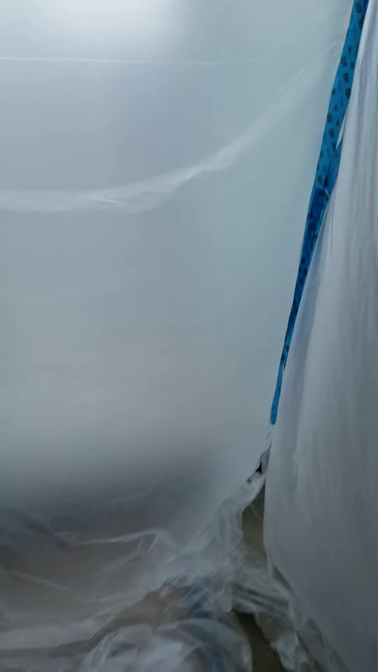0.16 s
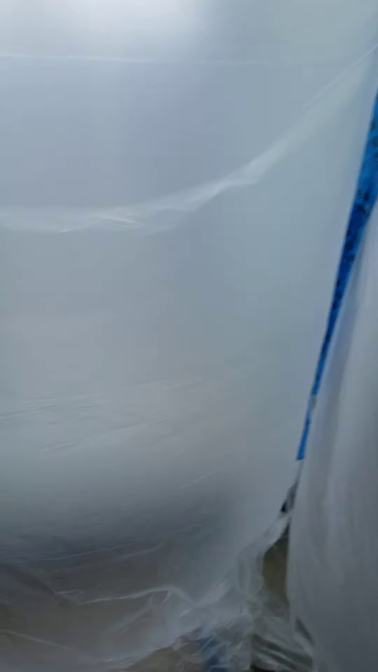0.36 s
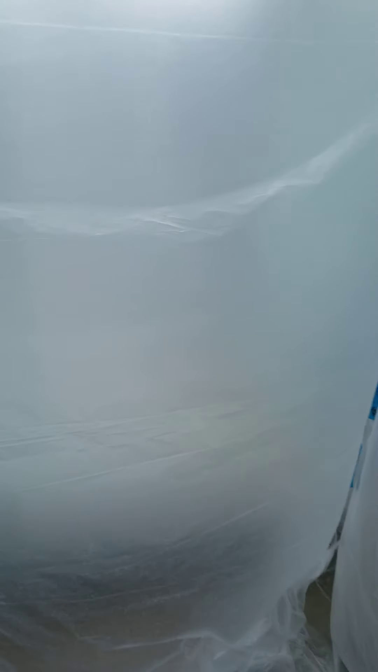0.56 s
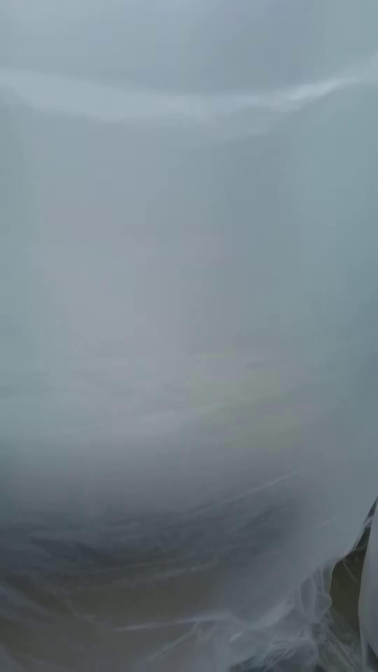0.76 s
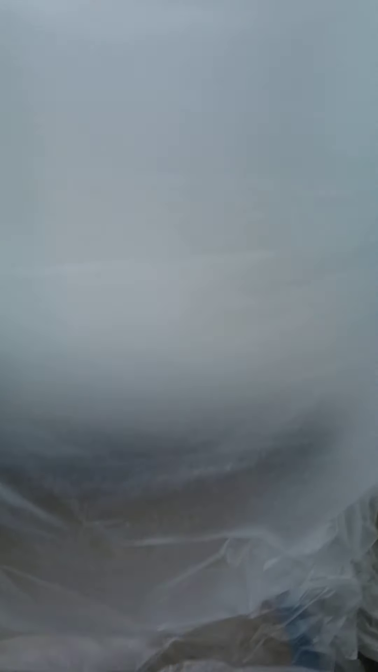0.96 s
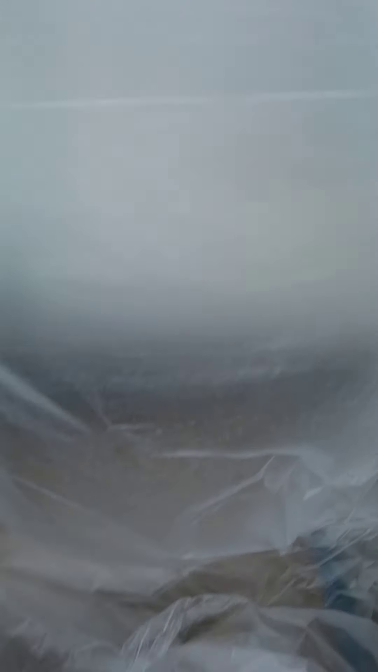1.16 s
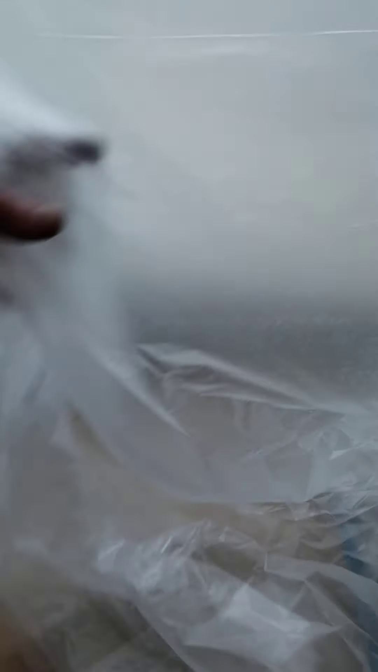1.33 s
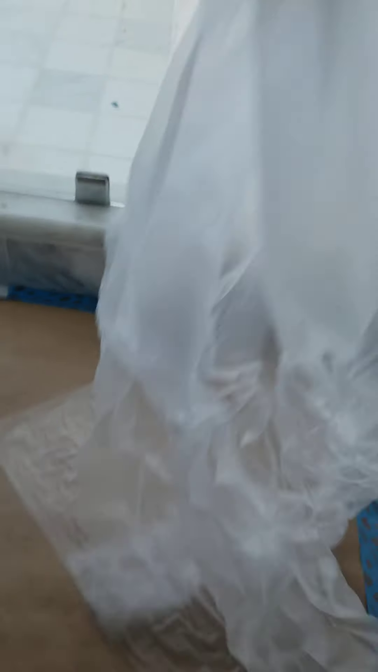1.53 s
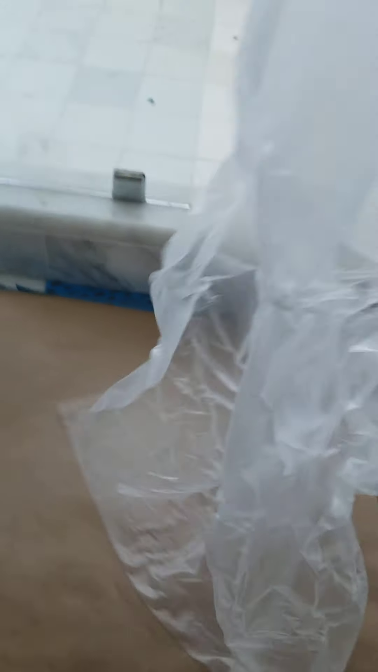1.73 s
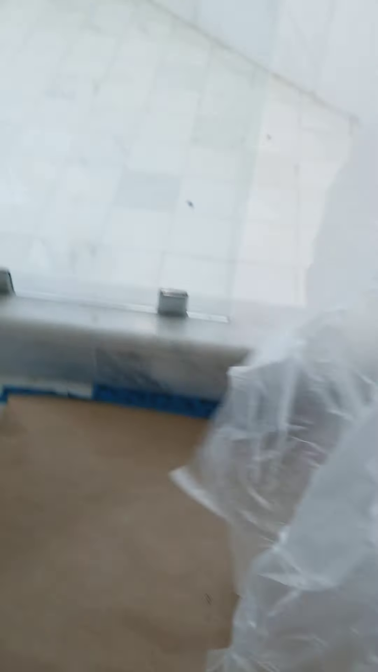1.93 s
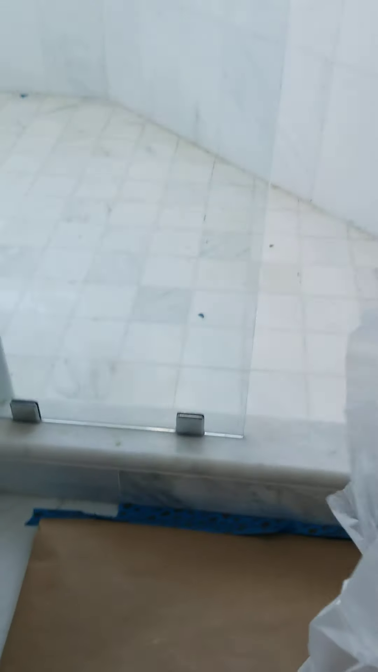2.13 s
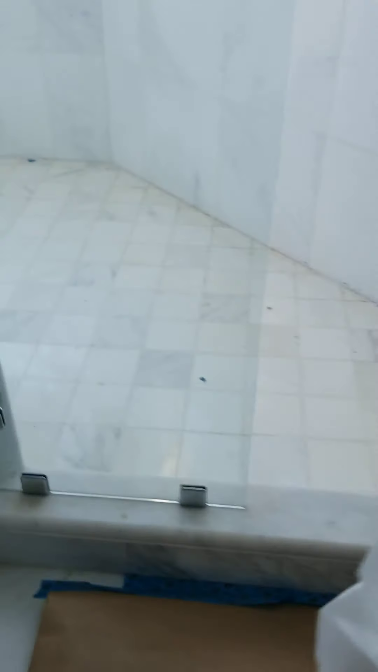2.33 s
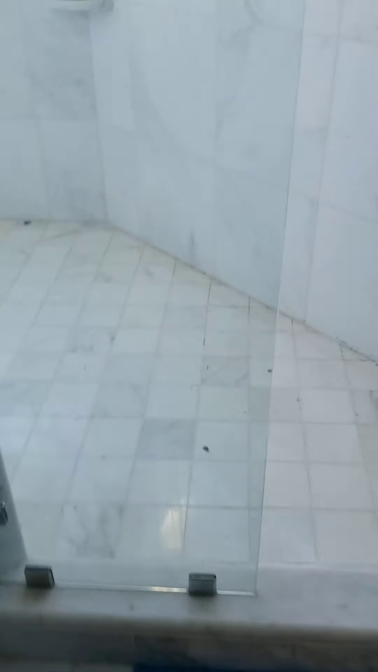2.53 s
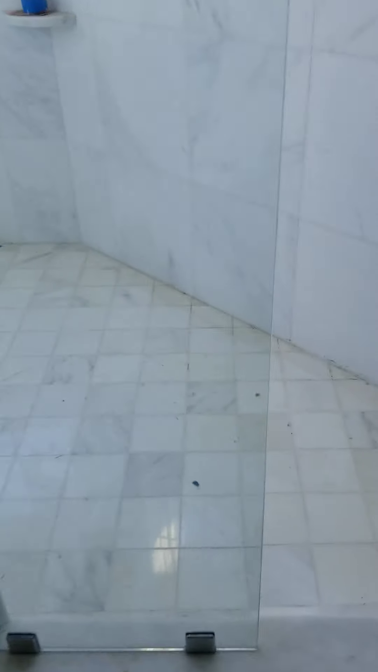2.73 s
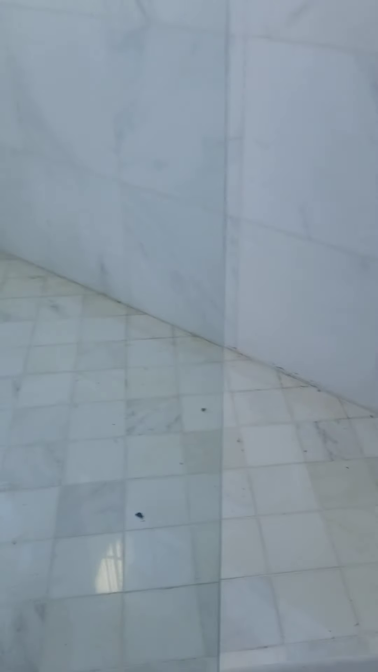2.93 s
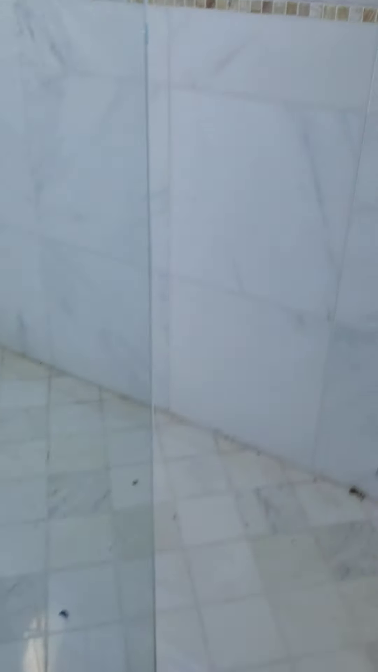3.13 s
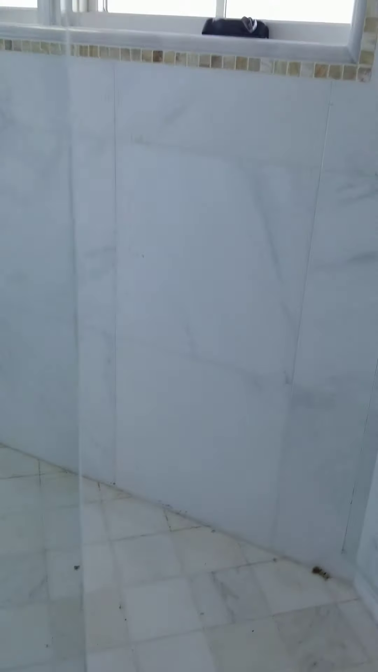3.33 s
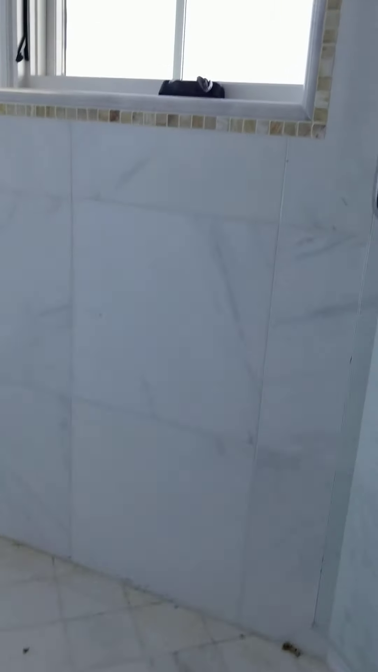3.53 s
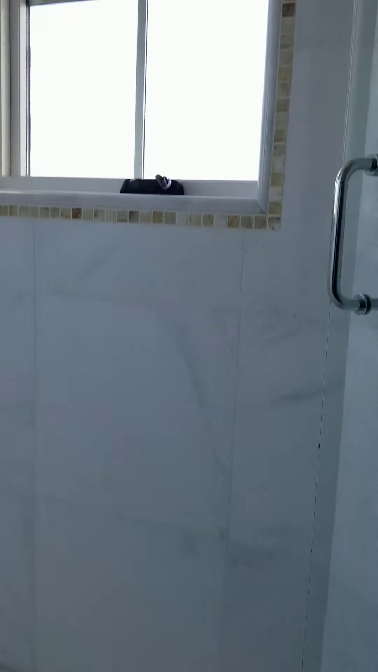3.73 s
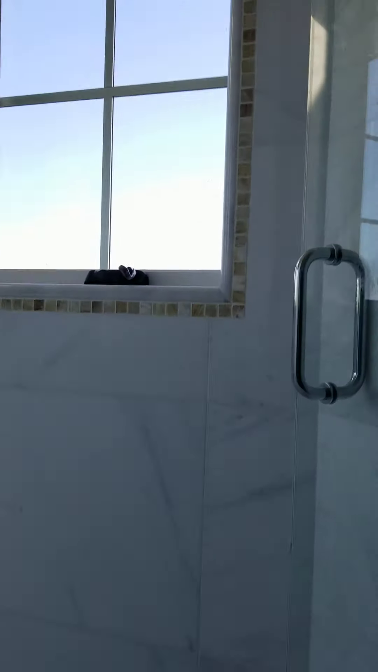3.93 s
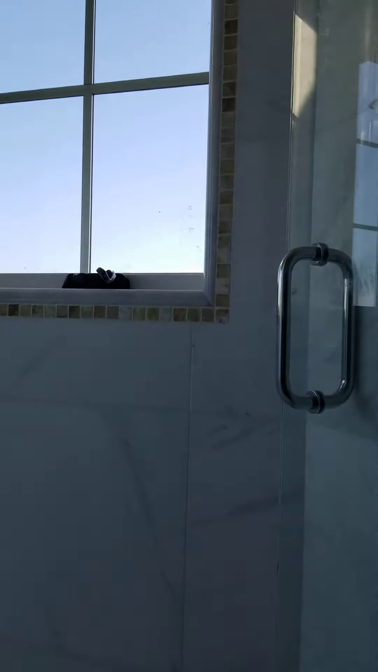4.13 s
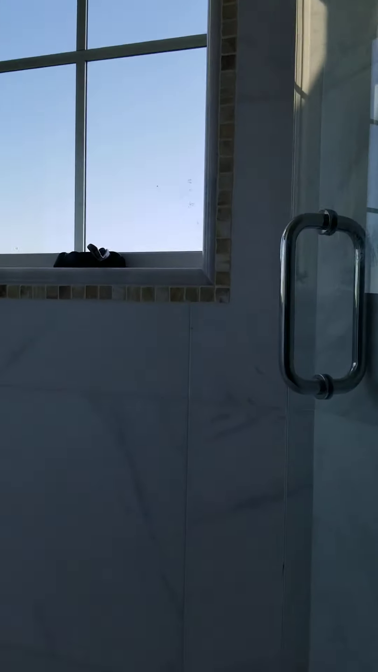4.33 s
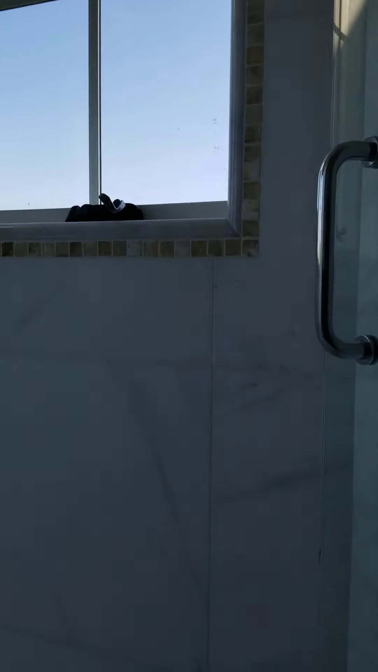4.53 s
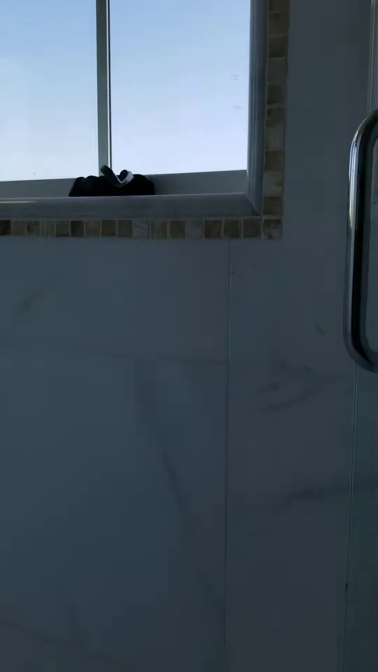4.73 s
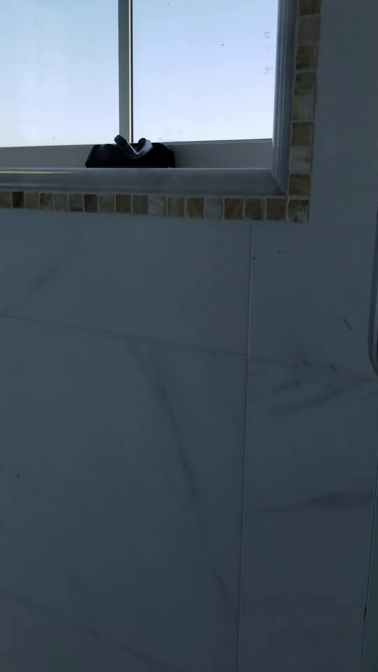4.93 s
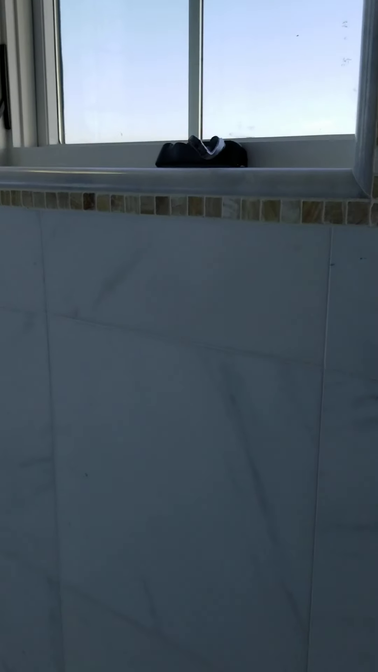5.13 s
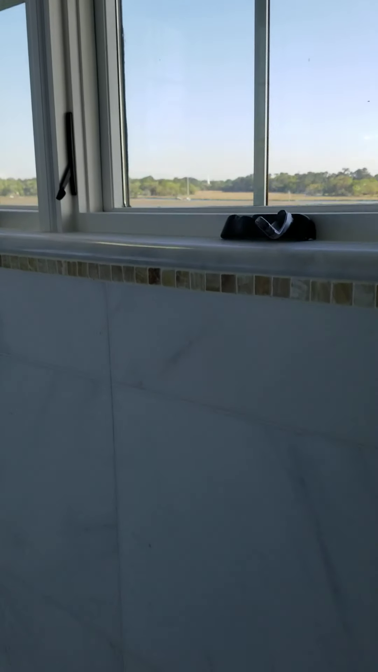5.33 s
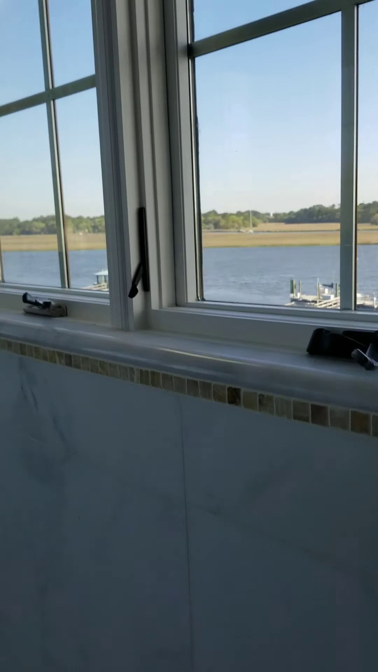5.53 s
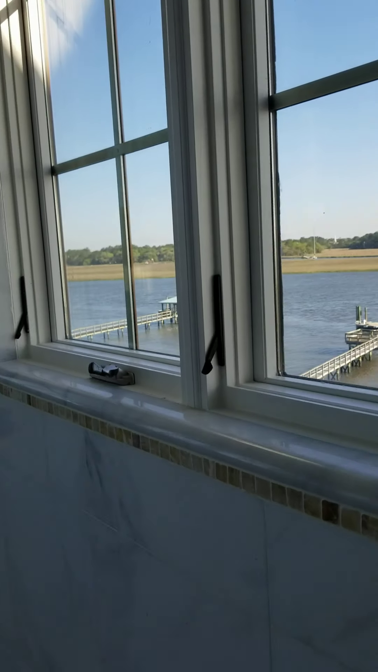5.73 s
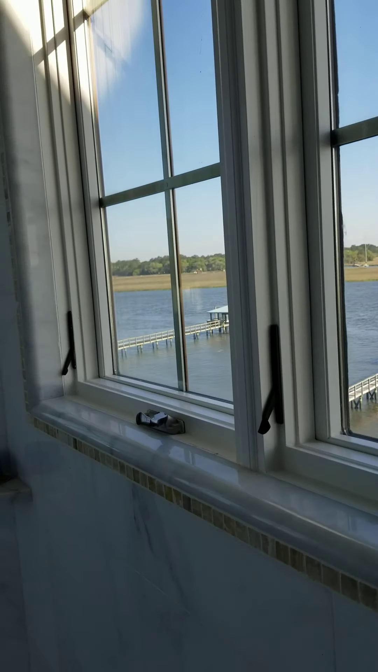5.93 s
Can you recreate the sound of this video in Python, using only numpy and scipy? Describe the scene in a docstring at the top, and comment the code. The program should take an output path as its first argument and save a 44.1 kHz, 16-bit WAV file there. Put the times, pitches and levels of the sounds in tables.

```python
"""Over a faint house drone, a curtain of thin plastic film stirs, then lands on a phone carried into a tiled room.
It slides along body and phone as a rush of tiny random slips; sweeps and creases add hiss bursts and cracks.
Folds snag and drag on the case, ringing its modes; the billowing sheet pushes low eddies over the two ports.
Soft bumps of the grip swell the pressure in the left port, and the film slowly trails off behind."""
import sys
import numpy as np
from scipy import signal
from scipy.fft import rfft, irfft
from scipy.io import wavfile
from scipy.ndimage import uniform_filter1d

SR = 44100
rng = np.random.default_rng(int(sys.argv[2]) if len(sys.argv) > 2 else 0)


def digitize_waveform(pressure):
    """Quantize a signal to 16-bit integers and store it at the path in sys.argv[1].

    Rows of a 2-D input are taken as channels; values are limited to [-1, 1].
    """
    field = np.atleast_2d(pressure).T
    bounded = np.clip(field, -1, 1)
    quanta = np.round(bounded * 32767).astype(np.int16)
    wavfile.write(sys.argv[1], SR, quanta)


N = 267758
TIME = np.arange(N) / SR
HZ = np.maximum(np.fft.rfftfreq(N, 1 / SR), 1)
# splits a left-minus-right difference in dB evenly over the two ports
LEFT_RIGHT = np.array([[.5], [-.5]])


def undb(db):
    """Decibels to gain."""
    return 10 ** (np.asarray(db) / 20)


def unit(x):
    """Scale to rms 1."""
    return x / np.sqrt(np.mean(x ** 2))


def curves(table):
    """Each column of a table as a line through time."""
    s, *columns = np.transpose(table)
    return [np.interp(TIME, s, c) for c in columns]


def colour(points):
    """A spectrum in dB, joined on a log-frequency axis."""
    hz, db = np.transpose(points)
    return np.interp(np.log(HZ), np.log(hz), db)


def shape(x, response):
    """Filter by a frequency response."""
    spectrum = rfft(x, 2 * (N // 2))
    return irfft(spectrum * response, N)


def resonance(hz, width_hz):
    """Response of one damped mode, gain 1 at the centre."""
    return 1 / (1 + 1j * (HZ ** 2 - hz ** 2) / (HZ * width_hz))


def below(hz, order=8):
    """Smooth low-pass response."""
    return 1 / np.sqrt(1 + (HZ / hz) ** order)


def walk(rate_hz):
    """Random levels held 1 / rate_hz and slewed twice; spread near 1."""
    hold = max(int(SR / rate_hz), 2)
    steps = np.repeat(rng.standard_normal(N // hold + 1), hold)
    slewed = uniform_filter1d(uniform_filter1d(steps, hold), hold)
    return 1.3 * slewed[:N]


def slips(rate_hz, spread_db):
    """Three unrelated streams of tiny clicks of random sign and size, together at rms 1."""
    happens = rng.random((3, N)) < rate_hz / SR
    size = undb(spread_db * np.minimum(rng.exponential(size=(3, N)), 5))
    sign = rng.choice([-1, 1], (3, N))
    return unit(happens * size * sign)


def ports(streams, alike_hz):
    """Long waves reach both ports alike, short ones differently."""
    shared = below(alike_hz, order=2)
    return shape(streams[2], shared) + shape(streams[:2], np.sqrt(1 - shared ** 2))


def swell(start_s, rise_s, fade_db_per_s, hold_s=0):
    """Envelope of one movement: a smooth rise, a hold, an even fade in dB."""
    age_s = TIME - start_s
    attack = np.sin(np.pi / 2 * np.clip(age_s / rise_s, 0, 1)) ** 2
    return attack * undb(-fade_db_per_s * np.maximum(age_s - rise_s - hold_s, 0))


def tiles(sound, t60_s, wet_db):
    """Hard walls close by answer with a short, bright tail of decaying noise."""
    age_s = TIME[:SR // 2]
    tail = rng.standard_normal((2, len(age_s))) * undb(-60 * age_s / t60_s) * (age_s > .003)
    tail /= np.linalg.norm(tail, axis=1, keepdims=True)
    return sound + undb(wet_db) * signal.fftconvolve(sound, tail, axes=1)[:, :N]


def house():
    """Faint background noise and a wavering drone at a low room resonance."""
    # Spectrum of the background. Each row: frequency in Hz, relative density in dB per Hz.
    air_colour = [(25, 4), (45, 1), (70, 8), (100, -3), (175, -1.5), (260, -2.5), (400, -8.5), (700, -39),
                  (1300, -35), (2300, -9.5), (8000, -49), (16000, -46)]
    # Low drone. Each row: time in seconds, level in dB.
    drone_levels = [(0, -55.5), (.3, -49.5), (.9, -68.5), (2.4, -51), (4.1, -62), (4.7, -54.5),
                    (6.07, -55.5)]
    air_db = -57.5
    drone_db, = curves(drone_levels)
    air = shape(ports(rng.standard_normal((3, N)), alike_hz=556), undb(colour(air_colour)))
    drone = shape(rng.standard_normal(N), resonance(131, 33) ** 2)
    return unit(air) * undb(air_db) + unit(drone) * undb(drone_db)


def buffet():
    """Air pushed over the ports by the billowing sheet: low eddies, different at each, on a faint draught."""
    # Billows of the sheet. Each row: start in seconds, rise in seconds, level in dB.
    billows = [(.77, 0.19, -51.5), (1.58, 0.16, -50), (1.77, 0.071, -41.5), (1.96, 0.036, -47),
               (2.15, 0.031, -39), (2.63, 0.078, -28), (3.24, 0.063, -50), (3.58, 0.033, -58)]
    fade_db_per_s, draught_db = 125, -65
    air = undb(draught_db) + sum(undb(db) * swell(s, rise_s, fade_db_per_s) for s, rise_s, db in billows)
    eddies = unit(shape(rng.standard_normal((2, N)), resonance(86, 110) * below(230, order=4)))
    return eddies * air * undb(LEFT_RIGHT * 2.8)


def bumps():
    """Each bump squeezes the air in the left port: one swell of pressure with a dip on either side."""
    # Soft bumps. Each row: time in seconds, left peak in dB before the slip roughens it, swing in Hz.
    presses = [(1.874, -24.5, 61.6), (1.93, -27, 65), (3.762, -24, 66), (3.869, -19, 78.4),
               (3.936, -28, 80), (4.52, -26, 70.6), (5.389, -25.5, 66.3), (5.678, -21.5, 91.5)]
    push = np.zeros(N)
    for s, db, hz in presses:
        turns = (TIME - s) * hz
        push += undb(db) * np.cos(2 * np.pi * turns) * np.exp(-np.abs(turns) / 0.34)
    # the skin slips a little while it presses
    slip = unit(shape(rng.standard_normal(N), resonance(223, 150)))
    return push * (1 + 0.26 * slip) * undb([[0], [-24]])


def creases():
    """A crease flips over: a crack of a millisecond or two, coloured by the size of the fold."""
    # Single pops. Each row: time in seconds, peak in dB before panning, centre in Hz, width in Hz,
    # left minus right pan in dB.
    pops = [(.3245, -50, 11900, 1200, -31), (0.774, -28, 1870, 650, -4), (5.2125, -27, 4000, 6000, -3),
            (5.522, -31, 13200, 4000, -9)]
    out = np.zeros((2, N))
    for s, db, hz, width_hz, pan_db in pops:
        age_s = np.maximum(TIME - s, 0)
        crack = (age_s > 0) * np.exp(-age_s / 0.0016) * rng.standard_normal((3, N))
        both = crack[2] + .5 * crack[:2]
        pop = shape(both, resonance(hz, width_hz) * resonance(hz, 2 * width_hz))
        out += pop / np.abs(pop).max() * undb(db + LEFT_RIGHT * pan_db)
    return out


def case_response():
    """Modes of the case: neighbours swing against each other, so little is left above the highest."""
    # Ringing of the case. Each row: frequency in Hz, width in Hz, relative level in dB.
    modes = [(117, 147, -2.5), (265, 120, 2.5), (407, 123, -0.5), (534, 47, 3.5), (697, 74, -2.5),
             (861, 104, 0), (1284, 112, -2.5)]
    response = 0
    for k, (hz, width_hz, db) in enumerate(modes):
        response = response + (-1) ** k * undb(db) * resonance(hz, width_hz)
    return response * below(1860)


def snags():
    """A fold catches and lets go; a quick release rings the higher modes of the case, a slow one the lower."""
    # Folds snagging. Each row: time in seconds, left peak in dB, right peak in dB, release quickness in Hz.
    catches = [(1.626, -22, -28, 695), (1.690, -28, -27, 850), (1.724, -28, -27, 895),
               (1.750, -33, -26, 900), (2.171, -18, -20, 416), (2.184, -18, -22, 566),
               (2.192, -25, -18.5, 900), (2.247, -23, -29, 1050), (2.255, -21.5, -29, 800),
               (2.697, -19, -32, 350), (2.788, -14, -36, 865), (2.857, -17, -39, 547),
               (5.401, -42, -35, 500), (5.676, -40, -43, 160)]
    out, body = np.zeros((2, N)), case_response()
    for s, left_db, right_db, hz in catches:
        ring = irfft(body * resonance(hz, 0.82 * hz), N)[:SR // 20]
        start = int(s * SR)
        out[:, start:start + len(ring)] += undb([[left_db], [right_db]]) * ring / np.abs(ring).max()
    return out


def drags():
    """Stick-slip judder rings the phone's case; film right on a port also scrapes brightly."""
    # Film dragging. Each row: start in seconds, length in seconds, left level in dB, right level in dB,
    # bare scrape in dB re ring.
    strokes = [(1.598, 0.24, -38.5, -39.5, -25), (2.167, 0.13, -34, -32.5, -27), (2.638, 0.12, -27, -53, 5),
               (2.671, 0.075, -46, -31, 3), (2.74, 0.098, -31.5, -35, 3), (2.818, 0.085, -32.5, -50, 2.5)]
    pressure, bare = np.zeros((2, 2, N))
    for s, length_s, left_db, right_db, scrape_db in strokes:
        envelope = np.interp((TIME - s) / length_s, [0, .12, .7, 1.1], [0.0013, 0.97, 0.66, 0.012])
        press = undb([[left_db], [right_db]]) * envelope
        pressure += press
        bare += press * undb(scrape_db)
    body = case_response()
    judder = ports(slips(rate_hz=1300, spread_db=0.0), alike_hz=595)
    ring = shape(judder * pressure, body) / np.linalg.norm(irfft(body, N))
    scrape = unit(shape(slips(rate_hz=5500, spread_db=4)[:2], resonance(2250, 3000)))
    return ring + scrape * bare * undb(1.8 * walk(120))


def sliding():
    """Hiss level, sheen and flexing (dB re hiss) of the film: the long slide and the sweeps add in power."""
    # Folds sweeping past. Each row: start in seconds, rise in seconds, hiss level in dB,
    # sheen in dB re hiss, flexing in dB re hiss.
    sweeps = [(0, 0.0033, -57.5, -3, 0), (.13, 0.032, -60.5, -4, -25), (.355, 0.019, -56, -5, -10),
              (.43, 0.036, -62, -21, 6), (.52, 0.18, -62, -5, 3.5), (.67, .06, -52.5, -0.5, -8),
              (.77, 0.052, -46.5, -1, -6), (1.2, .06, -37, 7, -20), (1.34, 0.071, -35.5, 5, -6.5),
              (1.47, .05, -35.5, 0, -8), (1.58, .1, -35, 4, -8), (1.81, 0.11, -30.5, -1, -8),
              (1.98, 0.052, -37.5, 1, -5), (2.15, .07, -34, -6, -7), (2.28, 0.11, -29.5, 4, -9),
              (2.44, 0.085, -29, 5, -9), (2.641, 0.065, -25.5, 6, -7.5), (3.04, 0.077, -31.5, 6, -9),
              (3.27, 0.043, -29.5, 7.5, -4.5), (3.35, 0.021, -30.5, 2.5, -22), (3.68, 0.076, -41, 4, -3.5),
              (4.06, 0.25, -42.5, 10, -38), (4.3, 0.23, -40, 5, -27), (4.48, 0.14, -39.5, -14, -5),
              (5.14, 0.19, -51, 8.5, -25), (5.33, 0.07, -52.5, 2, -10)]
    sweep_fade_db_per_s = 41.5
    # the film lands on the phone, presses harder while it is pushed aside, then trails off
    contact_s, attack_s, let_go_s = 1.087, 0.058, 3.306
    slide_db, press_db_per_s, trail_db_per_s = -34.5, 0.63, 7
    # trailing off, the sheen dulls and the slackening sheet flexes more
    slide_sheen_db, dulling_db_per_s = 4, 2
    slide_flex_db, slackening_db_per_s = -10, 2.5

    pushed_s = np.minimum(TIME, let_go_s) - contact_s
    trailing_s = np.maximum(TIME - let_go_s, 0)
    envelope = swell(contact_s, attack_s, trail_db_per_s, hold_s=let_go_s - contact_s)
    slide = undb(slide_db + press_db_per_s * pushed_s) * envelope
    moves = [(slide, slide_sheen_db - dulling_db_per_s * trailing_s,
              slide_flex_db + slackening_db_per_s * trailing_s)]
    for s, rise_s, db, sheen_db, flex_db in sweeps:
        moves.append((undb(db) * swell(s, rise_s, sweep_fade_db_per_s), sheen_db, flex_db))
    power = 0
    for gain, sheen_db, flex_db in moves:
        power = power + np.array([gain, gain * undb(sheen_db), gain * undb(flex_db)]) ** 2
    hiss_db, sheen_db, flex_db = 10 * np.log10(power + 1e-12)
    return hiss_db, sheen_db - hiss_db, flex_db - hiss_db


def film():
    """Countless slips merge into a hiss; sharper crinkles stand out of it; the sheet flexes underneath."""
    # Side of the film. Each row: time in seconds, left minus right in dB before a fixed 1.1 dB is added.
    side = [(0, -5.5), (1.25, -4.5), (1.6, -1.5), (2.55, -1.7), (3.05, -3.5), (3.9, -3.5), (4.08, -5),
            (6.07, -6.5)]
    # Spectrum of the film. Each row: frequency in Hz, relative density in dB per Hz.
    film_colour = [(100, -13.5), (260, -5.5), (450, -7.5), (1000, -5), (1700, -2), (2350, 1.5), (3100, -.5),
                   (3900, 0.5), (6800, -6.5), (7700, -5), (8900, -12.5), (12200, 2.5), (13600, 1.5),
                   (15700, 0.5)]
    # Left port against the right. Each row: frequency in Hz, left minus right in dB.
    port_colour = [(200, 2), (700, 3), (1300, -1), (2400, -4), (4400, 1), (8100, 1.5), (12300, -5),
                   (13600, 0), (14800, 11.5)]
    hiss_db, sheen_db, flex_db = sliding()
    pan_db, = curves(side)
    crinkles = undb(-12.0) * slips(rate_hz=900, spread_db=0.5)
    grains = slips(rate_hz=16000, spread_db=1.0) + crinkles
    heard = tiles(ports(grains, alike_hz=610), t60_s=0.14, wet_db=-15.0)
    sound = shape(heard, undb(colour(film_colour) + LEFT_RIGHT * colour(port_colour)))
    # three bands: flexing, hiss, sheen
    low, not_top = below(1600), below(10150, order=16)
    flex = unit(shape(sound, low)) * undb(flex_db + 1.03 * walk(30))
    hiss = unit(shape(sound, not_top - low)) * undb(0.35 * walk(45))
    # slow sliding makes blunter slips: the upper hiss dulls along with the sheen
    hiss = hiss + shape(hiss, 1 - below(4420)) * (undb(0.63 * sheen_db + 0.5) - 1)
    sheen = unit(shape(sound, 1 - not_top)) * undb(sheen_db + 0.48 * walk(60))
    # the contact grips and lets go, which shakes the whole sound at once
    return (flex + hiss + sheen) * undb(hiss_db + .5 * walk(70) + LEFT_RIGHT * (pan_db + 1.1))


def scene():
    """Everything at the two ports."""
    return house() + buffet() + bumps() + creases() + snags() + drags() + film()


def record(dry):
    """The phone cuts the deepest bass and the top."""
    top_hz = 15850
    thinned = signal.sosfilt(signal.butter(1, 22, "high", fs=SR, output="sos"), dry)
    return signal.sosfilt(signal.ellip(12, .1, 75, top_hz, fs=SR, output="sos"), thinned)


dry = scene()
out = record(dry)
digitize_waveform(out)
```